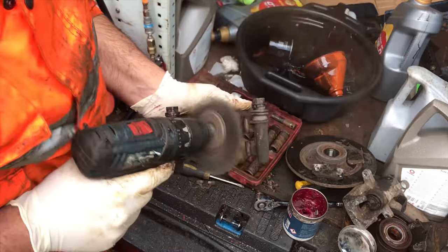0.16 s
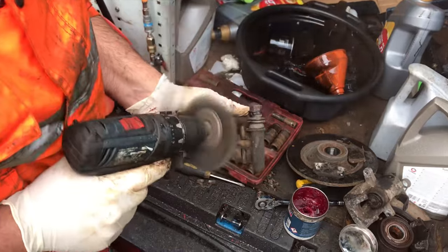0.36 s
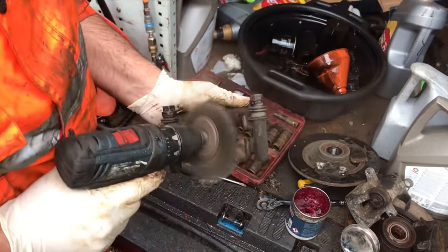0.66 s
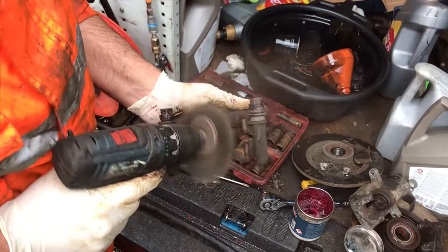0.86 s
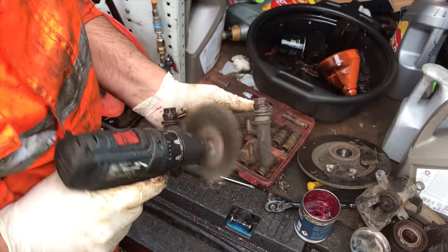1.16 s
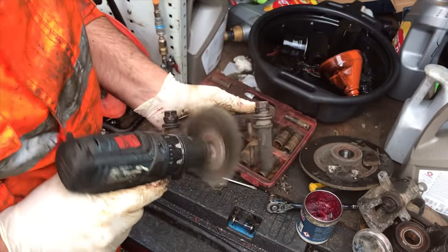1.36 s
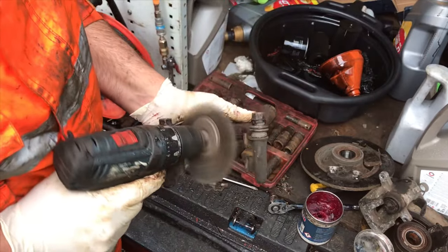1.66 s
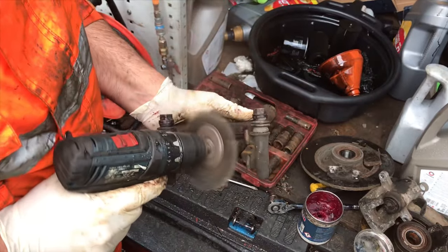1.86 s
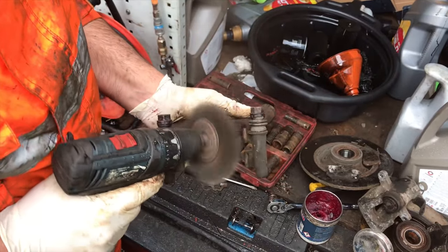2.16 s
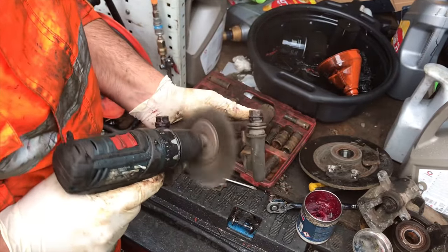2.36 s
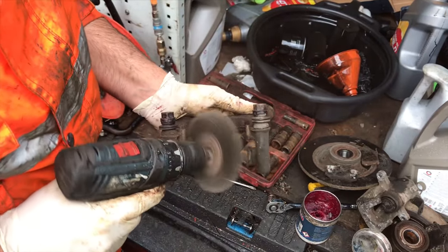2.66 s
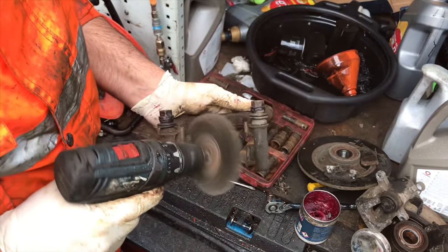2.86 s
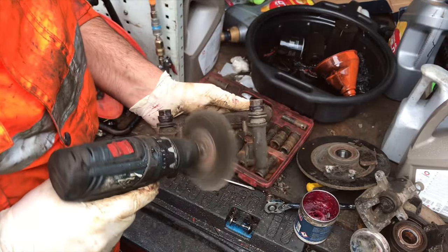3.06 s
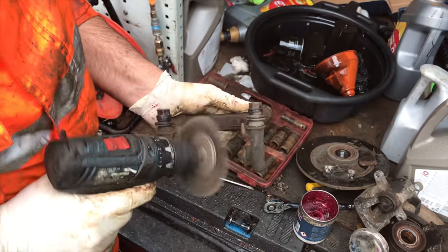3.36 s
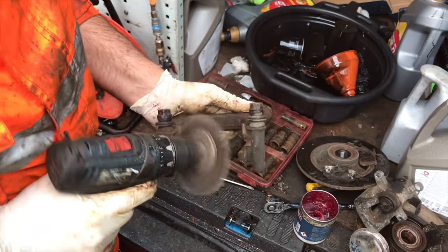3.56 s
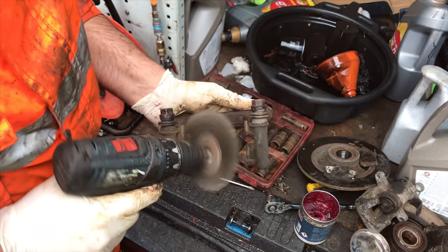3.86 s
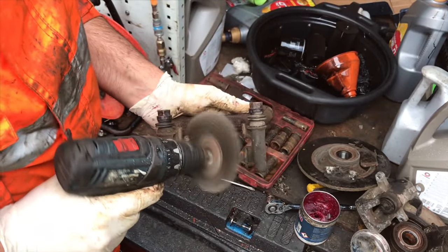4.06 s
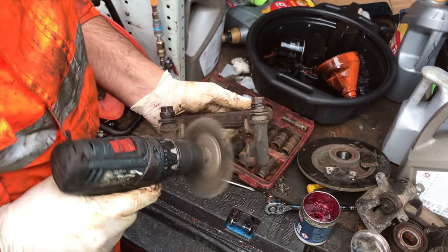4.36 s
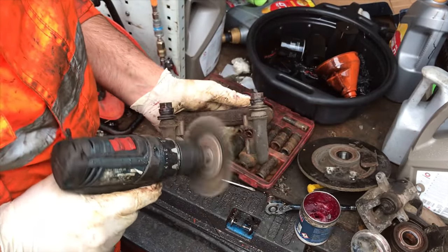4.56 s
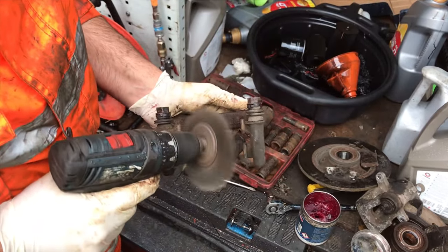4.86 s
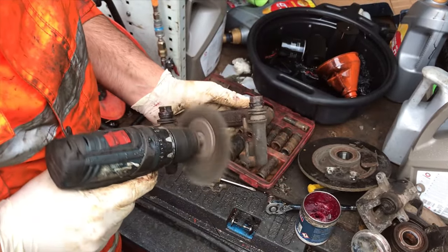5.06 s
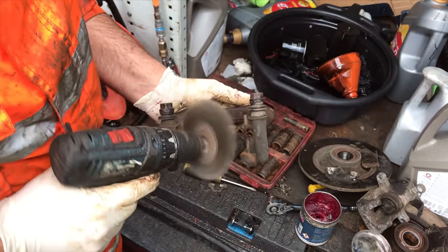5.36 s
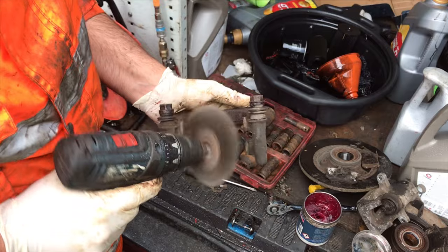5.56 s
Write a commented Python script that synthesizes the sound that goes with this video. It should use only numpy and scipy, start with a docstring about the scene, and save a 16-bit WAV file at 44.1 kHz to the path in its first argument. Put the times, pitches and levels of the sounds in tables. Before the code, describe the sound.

Close up, a spinning wire brush scours steel from start to finish, giving a fast, fluttering rasp with a slight metallic ring. The cordless drill driving it keeps up a wavering whine, rising a little when the pressure eases and sagging when it is pushed harder. A faint low workshop rumble lies underneath.

```python
"""A wire wheel on a cordless drill scrubs a rusty steel part, close by in a workshop.
The wheel runs out of true: once a turn, about 15 times a second, the wires bite, the motor sags
and the loaded gears whine. Between bites the tips skim the steel and the motor hums on.
The bench reflects the hiss; a low room rumble lies underneath."""
import sys
import numpy as np
from scipy.fft import rfft, irfft, next_fast_len
from scipy.io import wavfile
from scipy.ndimage import map_coordinates

SR = 44100
rng = np.random.default_rng(int(sys.argv[2]) if len(sys.argv) > 2 else 0)


def wav_out(sig):
    """Save sig, one row per channel (or a flat mono array), as 16-bit PCM at SR to the path in sys.argv[1]."""
    wavfile.write(sys.argv[1], SR, np.round(np.clip(np.atleast_2d(sig).T, -1, 1) * 32767).astype(np.int16))


N = 251811

# Workshop rumble spectrum (frequency [Hz], relative density [dB])
RUMBLE_SPECTRUM = [(15, -22), (30, 0), (48, 0), (62, 8), (80, 3), (110, 1.5), (160, -18), (205, -5),
                   (260, -21), (700, -24.5)]
# Motor speed before per-bite sag; harder pressure slows it (time [s], speed [turns/s])
MOTOR_SPEED = [(0.0, 297.6), (0.25, 295.6), (0.51, 314.8), (0.73, 297.6), (1.19, 286.4), (1.53, 287.2),
               (1.99, 306.2), (2.18, 297.9), (2.5, 301.2), (2.74, 293.2), (2.99, 295.3), (3.36, 281.5),
               (3.66, 280.1), (4.17, 296.7), (4.5, 294.0), (4.86, 302.7), (5.25, 290.9), (5.59, 288.4),
               (5.71, 301.0)]
# Motor and first gear stage (multiple of motor speed [1], free level [dB], loaded level [dB],
# boost at half load [dB], boost at top speed [dB], phase jitter [rad])
MOTOR_LINES = [(1.008, -40.5, -46.5, -2, 2.5, .06), (2.344, -48, -42.5, 10, -1, 0.23),
               (2.998, -34.5, -33, 4, 1.5, 0.36), (4.646, -43, -36.5, 4, 8.5, 0.54),
               (6.98, -30.5, -45, 9.5, -2, 0.52), (9.163, -34, -27.5, 1.5, -3.5, 0.83),
               (11.45, -31.5, -31.5, -3, 2, 1.45), (13.61, -35, -31, 5, 2, 1.1),
               (32.16, -35, -51, 6, 2, 0.39)]
# Output gear stage (multiple of mesh rate [1], relative level [dB])
MESH_HARMONICS = [(2, -14.5), (3, -28), (4, -33), (6, -26.5)]
# Drill housing resonances (frequency [Hz], width [Hz], gain [dB])
HOUSING_MODES = [(1368, 28, 3.5), (2743, 51, 3.5), (3030, 40, 3), (4096, 74, 4.5), (5750, 100, 9.5),
                 (9420, 120, 1.5)]
# Steel and wire peaks and dips (frequency [Hz], width [Hz], first spot [dB], second spot [dB])
STEEL_RING = [(1060, 12, 1, 3.5), (1376, 11.7, 7.5, 5), (1840, 185, 3.5, 3), (3020, 43, 2, 5),
              (3460, 290, 3.5, -1.5), (4180, 230, -3, 2.5), (4800, 110, -4.5, -2.5), (5450, 214, 5.5, 3),
              (6000, 460, -1.5, 3.5), (6420, 390, -1.5, -1), (7630, 110, -10, -5.5), (8260, 240, -3.5, 2.5),
              (9750, 480, 1, 2.5), (10360, 280, -3, -2), (11950, 620, 4.5, 5.5), (13340, 400, 4.5, 4),
              (14800, 330, 2, 5.5)]
# Wheel sliding along the part (time [s], share of second spot [0-1])
SPOT_SHARE = [(0, 0), (.65, 0.2), (.95, 1), (5.71, 1)]
# Wire tips digging in (frequency [Hz], relative density [dB])
BITE_SPECTRUM = [(20, -50), (200, -17), (520, -17.5), (1000, -12), (1500, -2.5), (2100, 0.5), (2400, -2.5),
                 (3100, 2), (4500, 1), (6200, -4), (7500, -3.5), (11000, -8.5), (15800, -15.5)]
# Wire tips skimming (frequency [Hz], relative density [dB])
SKIM_SPECTRUM = [(20, -73), (200, -16.5), (520, -15.5), (1150, -6), (1450, -2), (2100, 2.5), (2400, -3),
                 (3100, -4), (4300, 2), (6300, -2), (7600, -4), (11000, -9.5), (15800, -6.5)]
# Bite strength; weakest early on (time [s], relative level [dB])
BITE_LEVEL = [(0, -10.5), (.29, -12.5), (.43, -16), (.66, -9.5), (.9, -9.5), (1.35, -12.5), (2.15, -11.5),
              (2.43, -12.5), (2.65, -11), (3.15, -9.6), (3.55, -11.5), (4.3, -10.5), (5.4, -10.5),
              (5.71, -13)]
# Scrub treble shelf; dulls as work goes on (time [s], gain [dB])
SCRUB_TREBLE = [(0, 1.5), (.3, 3), (.55, 0), (2.4, 0.5), (2.9, -0.9), (5.71, -0.8)]

GEAR_RATIO, MESH_PER_MOTOR_TURN = 19.2247, 3.415
RUMBLE_DB, RUMBLE_DB_PER_S, RUMBLE_SWING_DB = -49.5, 0.25, 0.5
WHINE_DB, WHINE_SCATTER_DB = -0.3, 0.8
LABOUR_HZ, LABOUR_DB_PER_HZ = 286, 0.4  # whine fades below this motor speed
FREE_HZ, FREE_DB_PER_HZ = 302, 0.1  # above it the gears run lightly
SKIM_DB, SKIM_DB_PER_PRESS, SKIM_FIRST_SPOT_DB = -15.5, 5, -0.57
BITE_TRIM_DB, BITE_SCATTER_DB = -3, 0.5
TOP_HZ = 15750


def amp(db):
    """dB to gain."""
    return 10 ** (np.asarray(db) / 20)


def unit(x):
    """Scale to rms 1."""
    return x / np.sqrt(np.mean(x ** 2) + 1e-20)


def spectrum_db(points, hz):
    """Interpolate (frequency [Hz], level [dB]) on a log axis."""
    knots_hz, db = np.transpose(points)
    return np.interp(np.log(hz + 1), np.log(knots_hz), db)


def peaks_db(peaks, hz):
    """Sum Gaussian peaks (frequency [Hz], width [Hz], gain [dB])."""
    return sum(db * np.exp(-.5 * ((hz - mid_hz) / width_hz) ** 2) for mid_hz, width_hz, db in peaks)


def curve(points):
    """Interpolate (time [s], value) per sample."""
    return np.interp(np.arange(N) / SR, *np.transpose(points))


def wobble(rate_hz):
    """Smooth random curve, rms 1."""
    knots = rng.standard_normal(int(N * rate_hz / SR) + 4)
    return unit(map_coordinates(knots, [np.arange(N) * rate_hz / SR]))


def filtered(x, response):
    """Zero-phase filter with gain response(hz)."""
    size = next_fast_len(N + 8192)
    return irfft(rfft(x, size) * response(np.fft.rfftfreq(size, 1 / SR)), size)[:N]


def treble(x, corner_hz):
    """Soft high-pass."""
    return filtered(x, lambda hz: hz ** 4 / (hz ** 4 + corner_hz ** 4))


def swell(turns, centre_turns, width_turns):
    """One smooth bump per turn, peak 1."""
    offset_turns = (turns - centre_turns + .5) % 1 - .5
    return np.exp(-np.abs(offset_turns / width_turns) ** np.e)


def workshop():
    """Low, uneven room rumble, rising slightly."""
    rumble = unit(filtered(rng.standard_normal(N), lambda hz: amp(spectrum_db(RUMBLE_SPECTRUM, hz))))
    return amp(RUMBLE_DB + RUMBLE_DB_PER_S * np.arange(N) / SR + RUMBLE_SWING_DB * wobble(4.4)) * rumble


def bench(x, echo_db, count):
    """Tools and tins add weak early reflections of the hiss."""
    delays_s = rng.uniform(.001, .007, count)
    echoes = sum(np.pad(x, (round(s * SR), 0))[:N] for s in delays_s) / np.sqrt(count)
    return x + amp(echo_db) * treble(echoes, corner_hz=4500)


def housing(x):
    """Tones swell as they glide through the drill body's resonances."""
    return filtered(x, lambda hz: amp(peaks_db(HOUSING_MODES, hz)))


def motor(motor_turns, speed_hz, load):
    """Rotor and fast gear tones; levels follow speed and load."""
    overspeed = (speed_hz - speed_hz.mean()) / (speed_hz.max() - speed_hz.mean())
    backlash = 4 * load * (1 - load)  # teeth rattle at half load
    hum = np.zeros(N)
    for multiple, free_db, loaded_db, backlash_db, speed_db, jitter_rad in MOTOR_LINES:
        level_db = free_db + (loaded_db - free_db) * load + backlash_db * backlash + speed_db * overspeed
        flutter_db = 2 * jitter_rad * wobble(90)
        phase_rad = 2 * np.pi * multiple * motor_turns + jitter_rad * wobble(70)
        hum += amp(level_db + flutter_db) * np.sin(phase_rad)
    return np.sqrt(2) * hum


def gears(motor_turns, speed_hz, torque):
    """Output teeth whine under load; pitch falls through each bite."""
    labour_db = LABOUR_DB_PER_HZ * np.maximum(LABOUR_HZ - speed_hz, 0)
    free_db = FREE_DB_PER_HZ * np.maximum(speed_hz - FREE_HZ, 0)
    whine_db = WHINE_DB - labour_db - free_db + WHINE_SCATTER_DB * wobble(15)
    windup_rad = 0.36 * torque  # the train twists and springs back
    jitter_rad = 0.15 * wobble(40) + 0.078 * wobble(400)
    mesh_rad = 2 * np.pi * MESH_PER_MOTOR_TURN * motor_turns + windup_rad + jitter_rad
    tones = sum(amp(db + 0.61 * wobble(130)) * np.sin(multiple * mesh_rad + 0.096 * wobble(44))
                for multiple, db in MESH_HARMONICS)
    return np.sqrt(2) * amp(whine_db) * torque ** 1.45 * tones


def wheel_runout(speed_hz, press):
    """One bite per turn sags the motor; pressure makes it earlier and longer."""
    turns = np.cumsum(speed_hz) / SR / GEAR_RATIO
    centre_turns = .348 - 0.86 * press + 0.0045 * wobble(9.8)
    depth = swell(turns, centre_turns, width_turns=0.22 + 0.4 * press)
    graze = swell(turns, centre_turns - .15, width_turns=0.19)  # longest wires arrive first
    torque = swell(turns, centre_turns - .012, width_turns=0.25 + 0.17 * press)
    # stray tuft on the far side
    tuft = swell(turns, centre_turns + 0.553, width_turns=0.027) * amp(3 * wobble(14))
    sag_hz = (5.24 + 40 * press) * np.sin(2 * np.pi * (turns - .358))
    motor_turns = np.cumsum(speed_hz - sag_hz) / SR
    return motor_turns, graze, depth + 0.094 * tuft, torque + 0.31 * tuft


def wire_strikes(rate_hz, clump_db):
    """Dense, uneven flicks of single wire tips, arriving in tufts."""
    hits = rng.random(N) < rate_hz / SR
    signs = np.sign(rng.standard_normal(N))
    sizes = amp(3 * rng.standard_normal(N))
    return unit(hits * signs * sizes * amp(clump_db * wobble(550) + 0.38 * wobble(110)))


def steel(strikes, spectrum, spot_share):
    """The part colours the strikes; its ring crossfades between two contact spots."""
    spots = []
    for spot in range(2):
        ring = [(mid_hz, width_hz, gains_db[spot]) for mid_hz, width_hz, *gains_db in STEEL_RING]
        coloured = filtered(strikes, lambda hz: amp(spectrum_db(spectrum, hz) + peaks_db(ring, hz)))
        spots.append(unit(coloured))
    return (1 - spot_share) * spots[0] + spot_share * spots[1]


def wire_brush(graze, depth, press):
    """Wires scrub hard in each bite and skim all the way round."""
    spot_share = np.clip(curve(SPOT_SHARE), 0, 1)
    bite_db = curve(BITE_LEVEL) + BITE_TRIM_DB + BITE_SCATTER_DB * wobble(15)
    skim_db = SKIM_DB + SKIM_DB_PER_PRESS * press + SKIM_FIRST_SPOT_DB * (1 - spot_share)
    bite_strikes = wire_strikes(rate_hz=11000, clump_db=-0.5)
    skim_strikes = wire_strikes(rate_hz=14000, clump_db=0.6)
    bite = depth * amp(bite_db) * steel(bite_strikes, BITE_SPECTRUM, spot_share)
    skim = amp(skim_db) * steel(skim_strikes, SKIM_SPECTRUM, spot_share)
    swish = 0.25 * graze * treble(skim, corner_hz=4200)
    scrub = bite + skim + swish
    return scrub + (amp(curve(SCRUB_TREBLE)) - 1) * treble(scrub, corner_hz=7500)


def scene():
    """Room, drill and brush; both channels alike."""
    speed_hz = curve(MOTOR_SPEED)
    press = 1 - speed_hz / speed_hz.mean()  # hand pressure as share of mean speed lost
    motor_turns, graze, depth, torque = wheel_runout(speed_hz, press)
    drill = housing(motor(motor_turns, speed_hz, depth) + gears(motor_turns, speed_hz, torque))
    scrub = bench(wire_brush(graze, depth, press), echo_db=-15, count=8)
    mono = workshop() + drill + scrub
    return np.array([mono, mono])


def record(dry):
    """Soft-limit peaks; cut above TOP_HZ."""
    rounded = dry / (1 + np.abs(dry / 1.05) ** 6) ** (1 / 6)
    return np.array([filtered(channel, lambda hz: hz < TOP_HZ) for channel in rounded])


dry = scene()
out = record(dry)
wav_out(out)
```